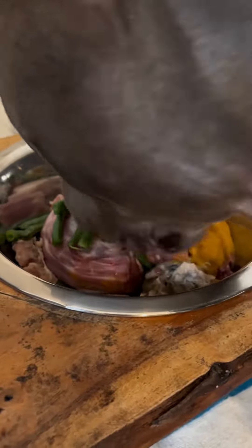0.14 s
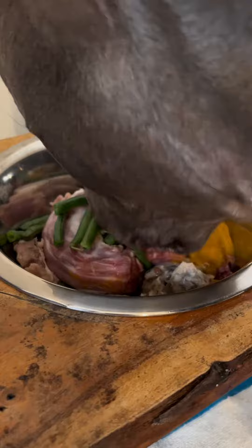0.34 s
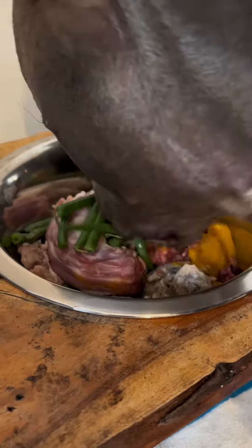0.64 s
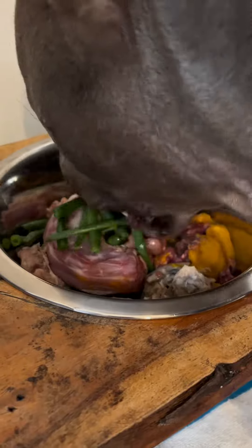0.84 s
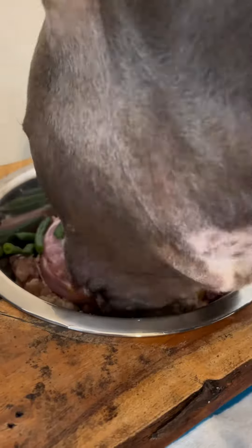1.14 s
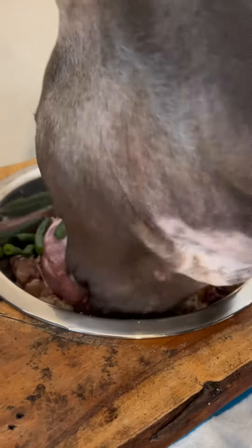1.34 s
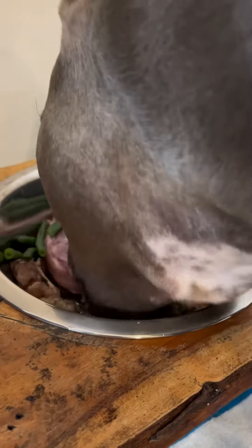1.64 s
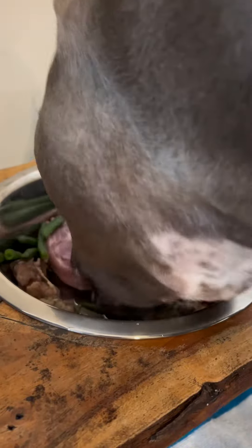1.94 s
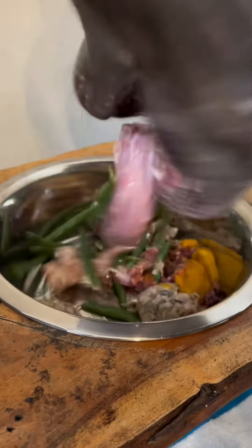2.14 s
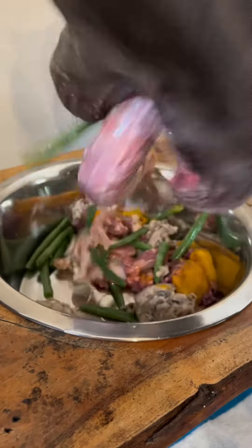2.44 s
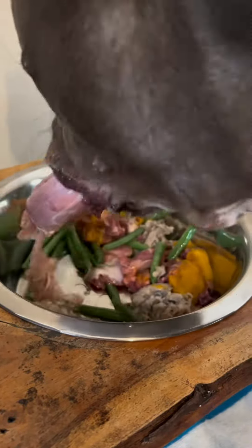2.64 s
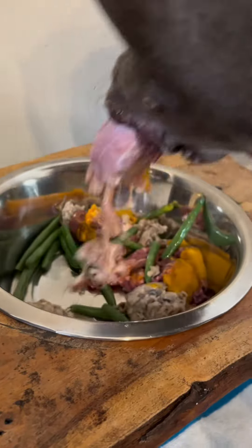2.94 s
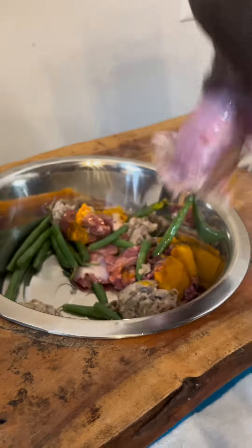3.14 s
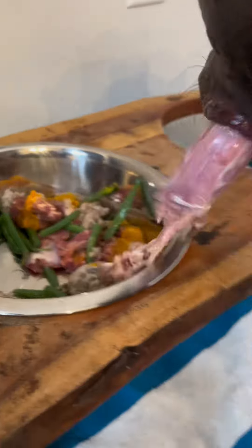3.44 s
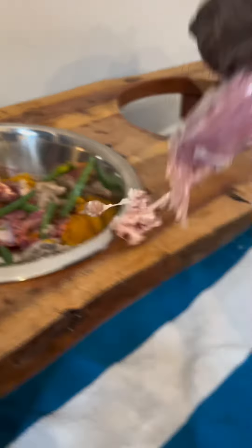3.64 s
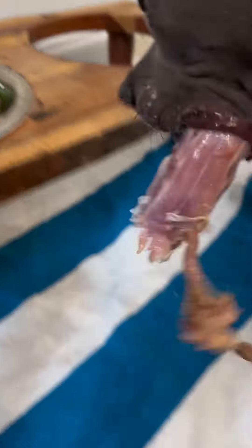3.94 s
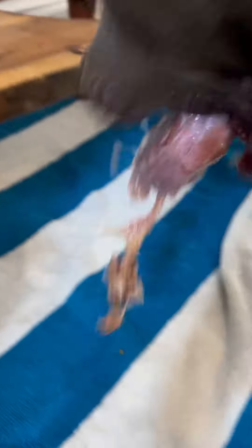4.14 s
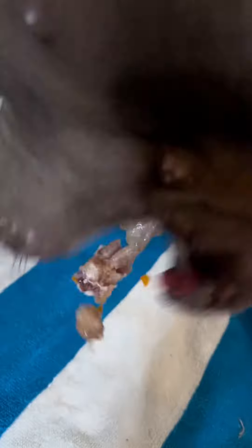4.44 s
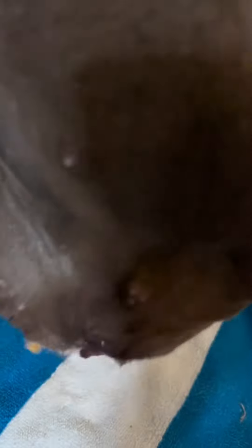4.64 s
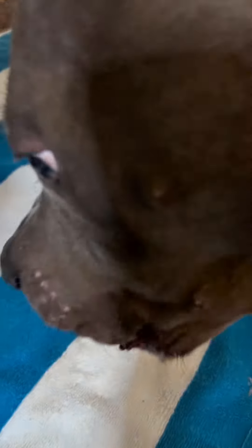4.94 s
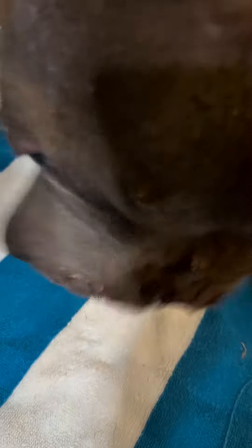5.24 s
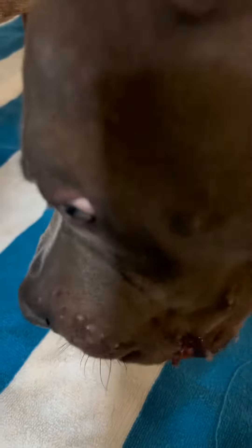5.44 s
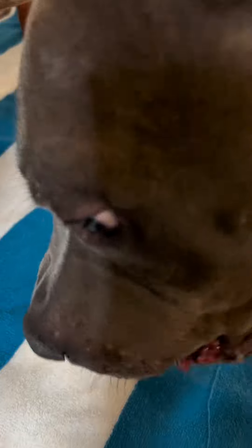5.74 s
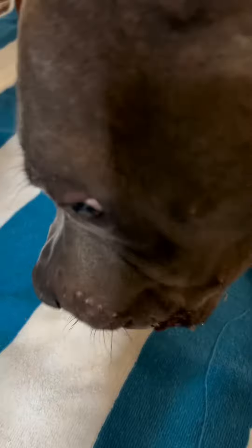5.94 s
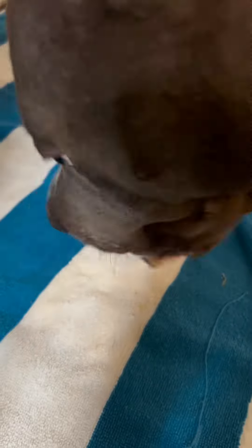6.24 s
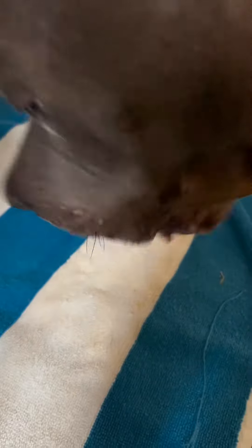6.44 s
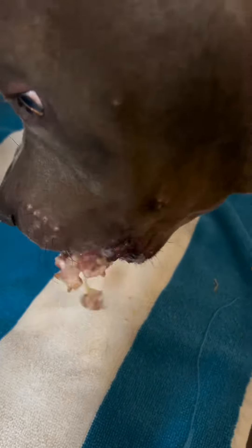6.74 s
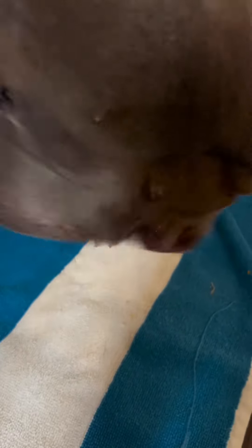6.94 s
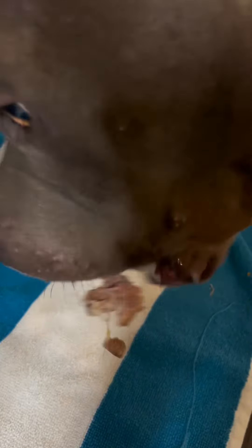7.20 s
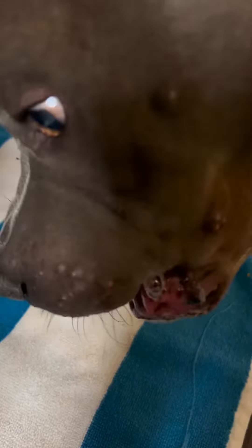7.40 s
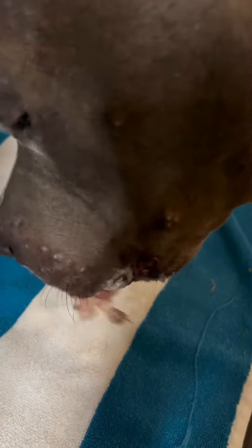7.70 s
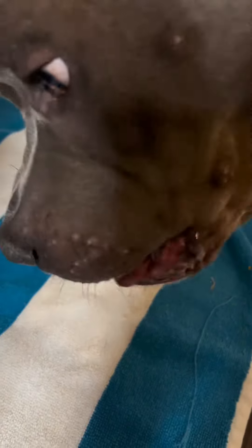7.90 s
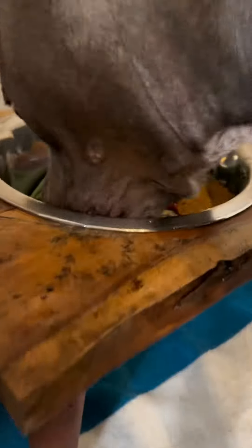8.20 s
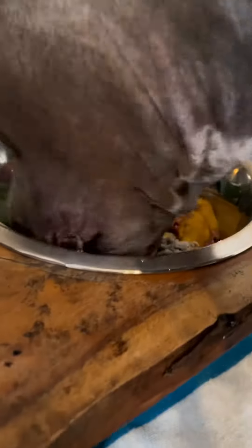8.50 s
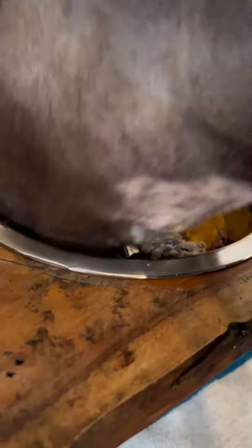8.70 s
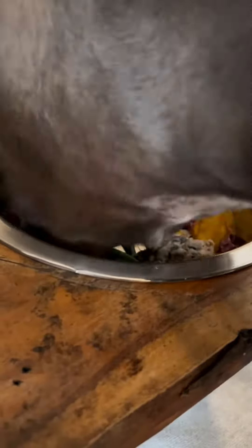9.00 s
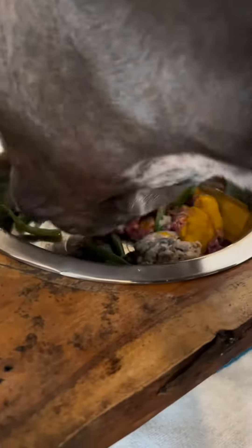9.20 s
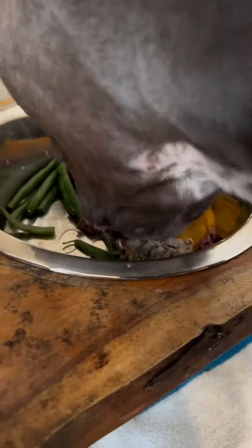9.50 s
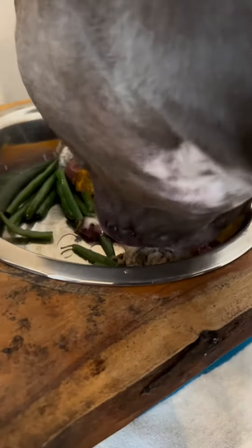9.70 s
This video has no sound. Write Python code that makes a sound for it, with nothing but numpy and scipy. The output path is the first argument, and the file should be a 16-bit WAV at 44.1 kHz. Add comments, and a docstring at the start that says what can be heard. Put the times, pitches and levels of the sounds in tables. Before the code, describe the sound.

Close, moist dog chewing in a quiet humming room: squelching mash, lip smacks, hollow plops, faint bowl clanks and crunching bone.

```python
"""A low hum and faint whirr in a small room, then wet chewing: a big dog eats meat and vegetables
from a steel bowl on a wooden stand, close to a stereo microphone. Jaw strokes swell streams of mash
bubbles and saliva crackle; air pockets plop as sinking sines; lips smack as torn noise in mouth
resonances; strands tick; meat rasps by stick and slip; the muzzle thuds the stand, a scrap slaps the
bowl, soft thumps fall, a scrap is slurped and gristle cracks. Scattered noise echoes form the room."""
import sys
import numpy as np
from scipy import signal
from scipy.fft import rfft, irfft, next_fast_len
from scipy.io import wavfile
from scipy.ndimage import uniform_filter1d, map_coordinates

SR = 44100
rng = np.random.default_rng(int(sys.argv[2]) if len(sys.argv) > 2 else 0)


def to_wav(sig):
    """Store sig (one row per channel, or 1-D mono) as 16-bit WAV at the path in sys.argv[1].

    Samples outside -1..1 are clipped; the rate is SR.
    """
    pcm = np.clip(np.atleast_2d(sig), -1, 1) * 32767
    pcm = np.round(pcm).astype(np.int16)
    wavfile.write(sys.argv[1], SR, pcm.T)  # frames by channels


N = 434826

# Event levels are relative; the functions trim some of them.
# room air spectrum: frequency_hz, level_db
AIR_SPECTRUM = [(20, -13), (45, 24), (80, 8), (400, -1), (900, -20.5), (6000, -17), (12800, -29),
                (15500, -42)]
# left-right likeness of diffuse sound: frequency_hz, correlation
LIKENESS = [(60, .99), (290, .8), (640, .3), (3500, 0), (6000, .7), (15000, .85)]
# jaw and tongue strokes: start_s, squeeze_s, mash_db, crackle_db
CHEW_STROKES = [(0.072, 0.012, -48, -43.5), (0.199, 0.089, -37.5, -48.5), (0.389, 0.015, -44, -45.5),
                (0.523, 0.18, -43, -50.5), (0.868, 0.13, -47.5, -54.5), (1.135, 0.12, -43.5, -59),
                (1.975, 0.036, -41.5, -46.5), (2.052, 0.16, -37.5, -42), (2.402, 0.087, -35, -51),
                (2.594, 0.12, -40.5, -54.5), (2.81, 0.1, -49, -52), (2.963, 0.18, -38, -48),
                (3.249, 0.04, -52, -36.5), (3.604, 0.4, -48, -49), (4.048, 0.21, -48.5, -49.5),
                (4.351, 0.24, -39, -54), (4.654, 0.19, -43.5, -49), (4.866, 0.13, -40.5, -45),
                (5.226, 0.12, -43.5, -45.5), (5.573, 0.44, -44, -48), (5.776, 0.13, -33, -39.5),
                (6.057, 0.16, -43, -50.5), (6.378, 0.33, -47, -54), (6.53, 0.11, -42, -48),
                (6.955, 0.011, -40.5, -43), (7.253, 0.045, -32.5, -42), (7.368, 0.017, -47, -32.5),
                (7.411, 0.049, -30.5, -34), (7.773, 0.2, -40, -51), (8.394, 0.017, -32.5, -40),
                (8.552, 0.21, -46.5, -57), (8.895, 0.0097, -34.5, -43), (8.999, 0.16, -42, -55),
                (9.196, 0.006, -44, -44.5), (9.306, 0.01, -29, -47), (9.635, 0.016, -38, -39.5),
                (9.735, 0.034, -34.5, -57)]
# muzzle position: time_s, over_bowl (1 over the bowl, 0 beside the stand)
HEAD_POSITION = [(2.2, 0.66), (4.6, 0.24), (7.7, 0.086), (8.2, 0.2)]
# churning food spectrum: frequency_hz, level_db
MASH_SPECTRUM = [(70, -14), (120, -1.5), (220, 4), (290, -7), (470, 0), (750, -2), (1100, -61), (1600, -2),
                 (4000, -69)]
# wet crackle spectrum: frequency_hz, level_db
CRACKLE_SPECTRUM = [(500, 5.5), (1250, 5), (1800, -2), (3100, 14), (4600, 14.5), (6000, 14.5), (10000, 8),
                    (15500, 12)]
# air pockets opening in jowls and mash: start_s, level_db, pitch_hz
AIR_POCKETS = [(0.07, -24.5, 718), (0.238, -17.5, 640), (0.311, -19.5, 830), (0.547, -19.5, 710),
               (0.568, -26, 675), (0.648, -18.5, 782), (0.847, -27, 605), (0.89, -27, 730),
               (0.924, -27, 673), (0.946, -27.5, 570), (1.047, -28.5, 600), (1.124, -27, 700),
               (1.167, -25.5, 695), (1.215, -30.5, 540), (2.057, -20, 462), (2.125, -24, 455),
               (2.222, -16.5, 470), (2.28, -18, 502), (2.598, -27, 293), (3.041, -28.5, 594),
               (3.069, -28, 660), (3.375, -12, 517), (5.283, -29, 721), (5.315, -29, 940),
               (6.069, -27, 720), (6.383, -26.5, 675), (7.283, -21, 700), (7.401, -15, 664),
               (7.505, -23, 637), (7.7, -27, 697), (9.022, -30.5, 503)]
# lips and tongue parting: time_s, smack_db, cavity_hz, jowl_db, spray_db
LIP_SMACKS = [(0.182, -33.5, 1460, -35.5, -64), (0.5112, -36.5, 1520, -40.5, -47.5),
              (0.846, -34.5, 1320, -39, -49), (1.1116, -37.5, 1000, -41.5, -55),
              (1.1608, -33, 1160, -53, -56), (1.572, -40, 3360, -67, -51), (1.974, -33, 1600, -58, -53),
              (2.146, -24.5, 2040, -43, -32), (2.176, -24.5, 2960, -32.5, -34.5),
              (2.2798, -29, 2440, -38.5, -50.5), (2.349, -17.5, 2030, -38, -41),
              (2.5116, -16, 2880, -35.5, -28), (2.5785, -30, 1870, -39.5, -48),
              (2.6601, -31, 1880, -58, -81), (3.0015, -19, 2880, -69, -34), (2.975, -42, 2950, -50, -46),
              (3.1091, -25.5, 1300, -47, -38.5), (3.1948, -29.5, 1410, -42.5, -47),
              (3.275, -25, 2940, -37, -43), (3.369, -14, 1390, -28, -20), (3.3747, -8, 1430, -28, -52),
              (3.6168, -30.5, 1380, -41, -35.5), (3.672, -34.5, 1390, -48, -72),
              (3.8742, -34, 2380, -46, -47), (4.2084, -35, 1570, -50, -48),
              (4.3135, -31.5, 1710, -33.5, -44.5), (4.6587, -24.5, 2210, -46.5, -56),
              (4.7652, -36.5, 3380, -45, -49), (5.0931, -31.5, 3300, -47.5, -42),
              (5.3811, -26, 1990, -33.5, -49), (5.664, -20.5, 4600, -36, -35),
              (6.4058, -28, 4530, -63, -76), (6.5924, -19.5, 3060, -31.5, -75),
              (6.7658, -18, 4300, -41.5, -41.5), (6.906, -36.5, 1450, -49, -56),
              (6.967, -29.5, 2000, -39.5, -46.5), (7.164, -37, 990, -45, -64),
              (7.2793, -17.5, 4200, -31, -39), (7.398, -11, 1810, -32.5, -24.5),
              (7.499, -21.5, 1720, -37, -41.5), (7.586, -30.5, 1830, -88, -35.5),
              (7.994, -35, 1700, -46, -43.5), (8.0555, -27, 2720, -55, -55), (8.077, -21, 3080, -55, -43.5),
              (8.1674, -28, 2960, -38.5, -51), (8.6791, -28, 2460, -44, -39.5),
              (8.736, -35, 2120, -52, -59), (8.897, -24.5, 2360, -40.5, -74), (9.349, -28, 1290, -53, -55),
              (9.4283, -42, 1200, -45.5, -81), (9.5321, -28.5, 4840, -42.5, -44.5),
              (9.756, -32, 1340, -41.5, -72)]
# tearing and fracture noise in the mouth: frequency_hz, level_db
MOUTH_SPECTRUM = [(100, -12), (250, -1.5), (700, 3.5), (1200, -2.5), (1850, 6), (2400, -4), (3100, 7.5),
                  (5500, -1.5), (8000, -6.5), (15500, -23)]
# saliva strands snapping: time_s, level_db
STRAND_SNAPS = [(0.184, -33), (2.416, -39), (2.453, -45), (4.394, -36.5)]
# strand snap spectrum: frequency_hz, level_db
SNAP_SPECTRUM = [(800, -45), (3000, 6), (6000, 1.5), (8000, 0), (12500, 2), (15500, -5)]
# meat rubbing past teeth and tongue: start_s, length_s, throat_hz, throat_db, lip_hz, lip_db
MEAT_RASPS = [(0.207, 0.034, 486, -40, 1310, -45.5), (0.531, 0.055, 712, -40, 1300, -49),
              (0.849, 0.073, 573, -46.5, 1330, -51.5), (2.071, 0.063, 1020, -44.5, 1410, -49),
              (6.516, 0.088, 740, -41, 1720, -52), (7.388, 0.065, 845, -32.5, 1715, -41),
              (8.028, 0.032, 693, -39.5, 2880, -44), (8.381, .035, 750, -43, 2760, -40.5),
              (9.303, 0.045, 570, -42.5, 1240, -48), (9.642, 0.031, 570, -39, 1420, -49)]
# muzzle against stand: start_s, level_db
STAND_BUMPS = [(1.114, -33), (2.06, -29.5), (2.338, -27), (3.026, -24.5), (4.05, -31.5), (8.177, -32),
               (8.612, -31)]
# blows on the bowl: start_s, level_db
BOWL_HITS = [(3.002, -56), (3.273, -39.5), (3.372, -34.5)]
# steel bowl modes: frequency_hz, level_db, t60_s
BOWL_MODES = [(223, 10, 0.2), (578, 6.5, 0.33), (1250, 4, 0.38), (1450, 0, 0.65), (1990, 1, 0.26),
              (2740, 7, 0.36)]
# dog moving onto the towel: start_s, level_db
FLOOR_THUMPS = [(4.13, -32.5), (4.378, -30), (5.265, -32.5), (5.386, -31)]
# tongue drawing a scrap in: time_s, resonance_hz, level_db
SLURP_GLIDE = [(4.349, 791, -64), (4.388, 930, -41.5), (4.471, 1446, -51.5), (4.52, 968, -48.5),
               (4.565, 814, -45.5), (4.62, 697, -73)]
# gristle and bone fractures, with splinters: start_s, level_db
FRACTURES = [(5.7872, -10.5), (5.803, -39), (5.831, -29), (5.8368, -27), (5.8603, -12), (5.913, -48),
             (7.397, -25), (7.4118, -29)]
# closed mouth modes: frequency_hz, level_db, t60_s
JAW_MODES = [(375, -15, 0.02), (700, -20.5, 0.055), (955, -9.5, 0.01), (1510, -5, 0.0089),
             (1840, 3, 0.0078), (2440, -11, 0.0077), (2970, -5, 0.012), (3630, -8.5, 0.0083)]
# left minus right added over the bowl: frequency_hz, level_db
BOWL_PAN = [(250, -2), (900, -13), (1900, -8), (8000, -3)]
# room decay: frequency_hz, t60_s
ROOM_DECAY = [(150, 0.89), (600, 0.45), (2500, 0.44), (6000, 0.17)]
# phase lead of the left port: frequency_hz, lead_rad
PORT_PHASE = [(100, 0), (780, -1.5), (1100, 0), (2100, .9), (2800, -1.2), (4400, -2.5), (5100, -4.1),
              (6200, -3), (8100, 0), (10200, 3.1), (14400, 9.1)]

SQUEEZE_S, RELEASE_DB_PER_S, SAG_DB = .018, 299, 5
IDLE_MASH_DB, IDLE_CRACKLE_DB = -56.5, -64  # the wet mouth never quite rests
DRIP_DB, DRIP_FOLLOWS = -9, 0.96  # drip offset; dB of drips per dB of crackle
SQUELCH_DB, SQUELCH_BOWL_DB = -24, 3.5  # relative to mash; extra over the bowl
PAN_BESIDE_DB = 1.5  # left minus right beside the stand
TOP_HZ = 15700


def amp(db):
    """Decibels to gain."""
    return 10 ** (np.asarray(db) / 20)


def unit(x):
    """Scale to rms 1."""
    return x / np.sqrt(np.mean(x ** 2) + 1e-20)


def crest(x):
    """Scale so the loudest 4 ms have rms 1."""
    return x / np.sqrt(uniform_filter1d(x ** 2, size=176).max() + 1e-20)


def along(points, hz):
    """Interpolate (frequency_hz, value) points on a log axis."""
    point_hz, value = np.transpose(points)
    return np.interp(np.log(hz + 1), np.log(point_hz), value)


def filtered(x, response):
    """Apply a complex frequency response."""
    size = x.shape[-1]
    padded = next_fast_len(size + 8192)
    spectrum = rfft(x, padded) * response(np.fft.rfftfreq(padded, 1 / SR))
    return irfft(spectrum, padded)[..., :size]


def coloured(x, spectrum):
    """Shape by a (frequency_hz, level_db) spectrum, at rms 1."""
    return unit(filtered(x, lambda hz: amp(along(spectrum, hz))))


def bell_noise(noise, centre_hz, width_hz):
    """Concentrate noise around one frequency, at rms 1."""
    return unit(filtered(noise, lambda hz: 1 / (1 + ((hz - centre_hz) / width_hz) ** 2)))


def band_noise(centre_hz, width_hz, size):
    """Random noise around one frequency, at rms 1."""
    return bell_noise(rng.standard_normal(size), centre_hz, width_hz)


def add(track, start_s, sound):
    """Mix a sound into a track."""
    part = track[max(round(start_s * SR), 0):][:len(sound)]
    part += sound[:len(part)]


def diffuse(pair):
    """Blend two unrelated signals into left and right with frequency-dependent likeness."""
    turn = lambda hz: np.arccos(np.clip(along(LIKENESS, hz), -1, 1)) / 2
    mid, side = filtered(pair, lambda hz: np.array([np.cos(turn(hz)), np.sin(turn(hz))]))
    return np.array([mid + side, mid - side])


def ambience(hum_hz=72, hum_width_hz=22, whirr_hz=650, whirr_width_hz=70):
    """Coloured room air plus two narrow noise bands: an appliance's low hum and faint whirr."""
    noise = lambda: rng.standard_normal((2, N))
    air = amp(-58.5) * coloured(noise(), AIR_SPECTRUM)
    hum = amp(-56.0) * bell_noise(noise(), hum_hz, hum_width_hz)
    whirr = amp(-63.5) * bell_noise(noise(), whirr_hz, whirr_width_hz)
    return diffuse(air + hum + whirr)


def grains(rate_hz, centre_hz, spread, cycles, scatter_db):
    """Bursting films and bubbles: damped sines of random time, pitch and size, at rms 1."""
    count = int(rate_hz * N / SR)
    place, pitch, size = rng.random((count, 3)).T
    bell = lambda u: np.log((u + .01) / (1.01 - u)) / 1.7  # uniform to bell-shaped
    k = np.arange(min(10 * cycles * SR / centre_hz, 500)).astype(int)
    grain_hz = np.minimum(centre_hz * np.exp(spread * bell(pitch)), SR / 2)
    turns = grain_hz[:, None] * k / SR
    gain = amp(scatter_db * bell(size))[:, None]
    rings = gain * np.sin(2 * np.pi * turns) * np.exp(-turns / cycles)
    index = (place * N).astype(int)[:, None] + k
    return unit(np.bincount(index.ravel(), rings.ravel(), minlength=N)[:N])


def shifting(x, depth_db):
    """The changing mouth shape lifts and drops random patches of the spectrum."""
    z = signal.stft(x, nperseg=512)[2]
    field = rng.standard_normal(z.shape)
    for _ in range(2):
        field = uniform_filter1d(uniform_filter1d(field, size=5, axis=0), size=6, axis=1)
    return signal.istft(z * amp(depth_db * unit(field)), nperseg=512)[1][:N]


def ragged(rate_hz, depth_db):
    """Wet surfaces stick and let go: a fast, peaky random gain of rms 1."""
    knots = rng.standard_normal(int(N * rate_hz / SR) + 4).clip(-2, 2)
    return unit(amp(depth_db * map_coordinates(knots, [np.arange(N) * rate_hz / SR])))


def over_bowl():
    """Muzzle position over the bowl, per sample."""
    return np.interp(np.arange(N) / SR, *np.transpose(HEAD_POSITION))


def squeeze(length_s):
    """Stroke gain: pressure builds, eases as the food yields, then lets go."""
    t = np.arange(int((length_s + .4) * SR)) / SR - SQUEEZE_S
    sag_db = SAG_DB * np.clip(t / length_s, 0, 1)
    release_db = RELEASE_DB_PER_S * np.maximum(t - length_s, 0)
    return np.clip(1 + t / SQUEEZE_S, 0, 1) ** 2 * amp(-sag_db - release_db)


def effort():
    """Mash and crackle levels in dB: each stroke adds its power to the idle mouth's."""
    mash, crackle = np.full(N, amp(IDLE_MASH_DB) ** 2), np.full(N, amp(IDLE_CRACKLE_DB) ** 2)
    for start_s, length_s, mash_db, crackle_db in CHEW_STROKES:
        stroke = squeeze(length_s)
        add(mash, start_s - SQUEEZE_S, (amp(mash_db) * stroke) ** 2)
        add(crackle, start_s - SQUEEZE_S, (amp(crackle_db) * stroke) ** 2)
    return 10 * np.log10(mash), 10 * np.log10(crackle)


def drips(crackle_db):
    """Stray saliva bubbles pop at random as short damped sines, following the crackle level."""
    pops = grains(rate_hz=45, centre_hz=2700, spread=.65, cycles=1.8, scatter_db=5)
    return pops * amp(DRIP_DB + DRIP_FOLLOWS * crackle_db)


def squelch(mash_db):
    """Pressed wet food lets its air out in a dense run of small bubbles, stronger over the bowl."""
    bubbles = grains(rate_hz=500, centre_hz=1300, spread=.25, cycles=5, scatter_db=3)
    return bubbles * amp(mash_db + SQUELCH_DB + SQUELCH_BOWL_DB * over_bowl())


def chewing():
    """Mash churns in low bubbles and noise; saliva crackles in films, droplets and bright ticks."""
    mash_db, crackle_db = effort()
    bubbles = grains(rate_hz=420, centre_hz=700, spread=.45, cycles=2.2, scatter_db=3)
    churn = bubbles + amp(7) * rng.standard_normal(N)
    mash = coloured(shifting(churn, depth_db=2.5), MASH_SPECTRUM)

    films = grains(rate_hz=2200, centre_hz=3200, spread=.7, cycles=.6, scatter_db=4)
    droplets = grains(rate_hz=260, centre_hz=1900, spread=.45, cycles=6, scatter_db=4)
    wet = shifting(films, depth_db=3) + amp(-3) * droplets
    crackle = coloured(wet * ragged(rate_hz=75, depth_db=5), CRACKLE_SPECTRUM)

    # meat sliding on tongue and steel
    slide = unit(shifting(band_noise(1500, 1000, N), depth_db=5))
    rub = amp(-7.5) * slide * ragged(rate_hz=60, depth_db=11)

    bright = grains(rate_hz=900, centre_hz=11000, spread=.35, cycles=1, scatter_db=4)
    bright = bright * ragged(rate_hz=70, depth_db=11)
    bright_db = 0.58 * crackle_db + 7 * over_bowl() - 34  # carries best off the steel

    food = amp(mash_db - 7.5) * mash + squelch(mash_db)
    saliva = amp(crackle_db) * (crackle + rub) + amp(bright_db) * bright + drips(crackle_db)
    return food + saliva


def plops(attack_s=0.0011, t60_s=0.025, sag=0.014, overtone=1.78, overtone_db=-8,
          overtone_t60_s=0.0045, echo_db=-10):
    """An air pocket rings with a brief overtone, sinking as it opens; the bowl wall echoes it once."""
    out, t = np.zeros(N), np.arange(SR // 16) / SR
    chances = rng.random((len(AIR_POCKETS), 2))
    for (start_s, level_db, pitch_hz), (bend, delay) in zip(AIR_POCKETS, chances):
        sinking_hz = pitch_hz * (1 + 2 * sag * bend * (np.exp(-t / 0.0022) - .5))
        phase = 2 * np.pi * np.cumsum(sinking_hz) / SR
        ring = np.sin(phase) * amp(-60 * t / t60_s)
        ring += np.sin(overtone * phase) * amp(overtone_db - 60 * t / overtone_t60_s)
        ring = amp(level_db - 8.5) * crest(ring * (1 - np.exp(-(t / attack_s) ** 2)))
        add(out, start_s, ring)
        add(out, start_s + 0.00456 + 0.0084 * delay, amp(echo_db) * ring)
    return out


def smack(cavity_hz, peak_s, rise_t60_s=0.01, t60_s=0.016, spiky_db=4, sharpness=6, cavity_gain=39.0,
          reach=4.5, lag_cycles=1.091, jowl_hz=1000, spray_hz=6000):
    """A saliva film tears in a volley of snaps; returns cavity, jowl and spray parts."""
    t = np.arange(SR // 10) / SR - peak_s
    snaps = rng.standard_normal(len(t)) * amp(spiky_db * rng.standard_normal(len(t)).clip(-2, 2))
    tear = coloured(snaps * amp(-60 * np.maximum(-t / rise_t60_s, t / t60_s)), MOUTH_SPECTRUM)
    # lips open during the tear: low pitches come last
    tear = filtered(tear, lambda hz: np.exp(-2j * np.pi * lag_cycles * np.log(hz + 1)))
    # second mouth pocket, higher or lower by chance
    pocket_hz = cavity_hz * 2 ** (rng.choice([-1, 1]) * rng.uniform(0.043, 1))
    flesh_hz = reach * cavity_hz
    peak = lambda hz, centre: 1 / (1 + 1j * sharpness * (hz / centre - centre / (hz + 1)))
    cavity = lambda hz: 1 + cavity_gain * (peak(hz, cavity_hz) + .5 * peak(hz, pocket_hz))
    flesh = lambda hz: 1 / (1 + 1j * hz / flesh_hz - (hz / flesh_hz) ** 2)

    def band(edges_hz, kind):
        return signal.sosfilt(signal.butter(3, edges_hz, kind, fs=SR, output="sos"), tear)

    mouth = filtered(band([jowl_hz, spray_hz], "bandpass"), lambda hz: cavity(hz) * flesh(hz))
    return crest(mouth), crest(band(jowl_hz, "low")), crest(band(spray_hz, "high"))


def smacks(lead_s=0.0051):
    """Each smack rings the mouth at its current opening, thumps the jowls and throws spray."""
    out = np.zeros(N)
    for time_s, smack_db, cavity_hz, jowl_db, spray_db in LIP_SMACKS:
        cavity, jowl, spray = smack(cavity_hz, peak_s=0.0055)
        mix = amp(smack_db - 6.5) * cavity + amp(jowl_db) * jowl + amp(spray_db) * spray
        add(out, time_s - lead_s, mix)
    return out


def ticks(rise_t60_s=0.016, t60_s=0.0049, lead_s=0.0033):
    """A thin strand snaps: a bright noise burst with no body."""
    out, t = np.zeros(N), np.arange(SR // 30) / SR - lead_s
    for time_s, level_db in STRAND_SNAPS:
        snap = rng.standard_normal(len(t)) * amp(-60 * np.maximum(-t / rise_t60_s, t / t60_s))
        add(out, time_s - lead_s, amp(level_db) * crest(coloured(snap, SNAP_SPECTRUM)))
    return out


def rasps(slip_rate_hz=150, scatter_db=3, wander=0.068, glide=0.058, throat_t60_s=0.03, lip_t60_s=0.024,
          upper=1.99, upper_db=-7, grit_db=-6, grit_t60_s=0.0017):
    """Meat slips unevenly; each slip clicks, ringing throat and lips, which rise as the jaw closes."""
    out, t = np.zeros(N), np.arange(SR // 25) / SR

    def ring(hz, t60_s):
        return np.sin(2 * np.pi * hz * t) * amp(-60 * t / t60_s) * (1 - np.exp(-t / 0.00017))

    for start_s, length_s, throat_hz, throat_db, lip_hz, lip_db in MEAT_RASPS:
        count = max(round(length_s * slip_rate_hz), 1)
        throat, lips = np.zeros((2, round(length_s * SR) + len(t)))
        chances = rng.standard_normal((count, 5)).clip(-2, 2)
        for k, (late, size, low, high, top) in enumerate(chances):
            u = np.clip((k + 0.25 * late) / count, 0, 1)  # progress through the rasp
            rise, gain = 1 + glide * (u - .5), amp(scatter_db * size)
            grit = amp(grit_db - 60 * t / grit_t60_s) * rng.standard_normal(len(t))
            overtone_hz = upper * lip_hz * rise * (1 + 2 * wander * top)
            overtone = amp(upper_db) * ring(overtone_hz, lip_t60_s / upper)
            lip_ring = ring(lip_hz * rise * (1 + wander * high), lip_t60_s)
            throat_ring = ring(throat_hz * rise * (1 + wander * low), throat_t60_s)
            add(throat, u * length_s, gain * throat_ring)
            add(lips, u * length_s, gain * (lip_ring + overtone + grit))
        for part, level_db in (throat, throat_db), (lips, lip_db):
            add(out, start_s, amp(level_db) * part * np.sqrt(length_s * SR) / np.linalg.norm(part))
    return out


def thuds(events, centre_hz, detune_sd, t60_s, attack_s, size):
    """One damped, randomly detuned sine per (start_s, level_db) event."""
    out, t = np.zeros(N), np.arange(size) / SR
    for (start_s, level_db), detune in zip(events, rng.normal(0, detune_sd, len(events))):
        ring = np.sin(2 * np.pi * centre_hz * (1 + detune) * t)
        envelope = (1 - np.exp(-t / attack_s)) * amp(-60 * t / t60_s)
        add(out, start_s, amp(level_db) * ring * envelope)
    return out


def stand():
    """The wooden stand answers each muzzle bump with a dull, low damped sine."""
    return amp(-4) * thuds(STAND_BUMPS, 74, detune_sd=0.31, t60_s=0.32, attack_s=0.0034, size=SR // 3)


def bowl(cluster_hz=60, wash_hz=3400, wash_width_hz=1500, wash_db=5, wash_t60_s=0.54):
    """Food-laden steel clanks: clusters of close modes over a wash of dense upper ones."""
    out, t = np.zeros(N), np.arange(SR // 2) / SR
    for start_s, level_db in BOWL_HITS:
        ring = np.zeros(len(t))
        for mode_hz, mode_db, t60_s in BOWL_MODES:
            ring += amp(mode_db - 60 * t / t60_s) * band_noise(mode_hz, cluster_hz, len(t))
        wash = amp(wash_db - 60 * t / wash_t60_s) * band_noise(wash_hz, wash_width_hz, len(t))
        add(out, start_s, amp(level_db) * crest(ring + wash))
    return out


def thumps():
    """Padded contacts with the towel-covered floor: one dull, short damped sine each."""
    return thuds(FLOOR_THUMPS, 215, detune_sd=0.059, t60_s=0.062, attack_s=0.00081, size=SR // 6)


def slurp(width_hz=260):
    """Air hisses past the tongue: low noise shifted up to a gliding mouth resonance."""
    time_s, resonance_hz, level_db = np.transpose(SLURP_GLIDE)
    t = np.arange(N) / SR
    hiss = bell_noise(rng.standard_normal(N), 0, width_hz)
    carrier = np.sin(2 * np.pi * np.cumsum(np.interp(t, time_s, resonance_hz)) / SR)
    active = (t > time_s[0]) * (t < time_s[-1])
    return hiss * carrier * amp(np.interp(t, time_s, level_db)) * active


def cracks(attack_s=0.00069, lag_cycles=0.83, detune=0.028, snap_db=-8, snap_t60_s=0.02):
    """Each fracture is a dry snap ringing all mouth modes, the low ones a little later."""
    out, t = np.zeros(N), np.arange(SR // 20) / SR
    for start_s, level_db in FRACTURES:
        ring = np.zeros(len(t))
        for mode_hz, mode_db, t60_s in JAW_MODES:
            age = np.maximum(t - lag_cycles / mode_hz, 0)
            tone = np.sin(2 * np.pi * mode_hz * (1 + detune * rng.standard_normal()) * age)
            ring += tone * (1 - np.exp(-age / attack_s)) * amp(mode_db - 60 * age / t60_s)
        noise = rng.standard_normal(len(t)) * amp(-60 * t / snap_t60_s)
        snap = crest(coloured(noise, MOUTH_SPECTRUM))
        add(out, start_s, amp(level_db) * crest(crest(ring) + amp(snap_db) * snap))
    return out


def placed(x):
    """Pan the direct sound: over the bowl the middle frequencies lean right."""
    hz, s, z = signal.stft(x, SR, nperseg=256)
    over = np.interp(s, *np.transpose(HEAD_POSITION))
    pan_db = PAN_BESIDE_DB + np.outer(along(BOWL_PAN, hz), over)
    left = amp(pan_db / 2)
    return signal.istft(np.array([z * left, z / left]), SR, nperseg=256)[1][:, :N]


def room(x, early_db=-11, early_t60_s=0.017, tail_db=-13):
    """Stand, floor and wall scatter sound after 3 ms; a tail decays at its own rate per frequency."""
    hz, t, z = signal.stft(rng.standard_normal((2, SR * 2 // 3)), SR, nperseg=256)
    decay = amp(-60 * t / along(ROOM_DECAY, hz)[:, None])
    tail = signal.istft(z * decay, SR, nperseg=256)[1]
    t = np.arange(tail.shape[1]) / SR
    early = rng.standard_normal(tail.shape) * amp(-60 * t / early_t60_s) * (t > .003)
    tail = tail * (1 - np.exp(-t / 0.0001))
    answer = amp(early_db) * early / np.linalg.norm(early[0])
    answer += amp(tail_db) * tail / np.linalg.norm(tail[0])
    return diffuse(signal.fftconvolve(x[None], answer, axes=1)[:, :N])


def scene():
    """Sum the dog's sounds, pan them by head position, add room answer and ambience."""
    mouth = chewing() + plops() + smacks() + ticks() + rasps() + slurp() + cracks()
    dog = mouth + stand() + bowl() + thumps()
    return placed(dog) + room(dog) + ambience()


def record(dry, low_cut_hz=36, port_hz=5000, port_width_hz=400, port_db=6):
    """Two microphone ports differ in phase, and near 5 kHz the right one is louder; deep bass and top are cut."""
    bump = lambda hz: np.exp(-((hz - port_hz) / port_width_hz) ** 2)
    balance = lambda hz: amp(np.outer([0, port_db], bump(hz)))
    phase = lambda hz: np.exp(.5j * np.outer([1, -1], along(PORT_PHASE, hz)))
    band = lambda hz: hz ** 4 / (hz ** 4 + low_cut_hz ** 4) * (hz < TOP_HZ)
    return filtered(dry, lambda hz: balance(hz) * phase(hz) * band(hz))


dry = scene()
out = record(dry)
to_wav(out)
```